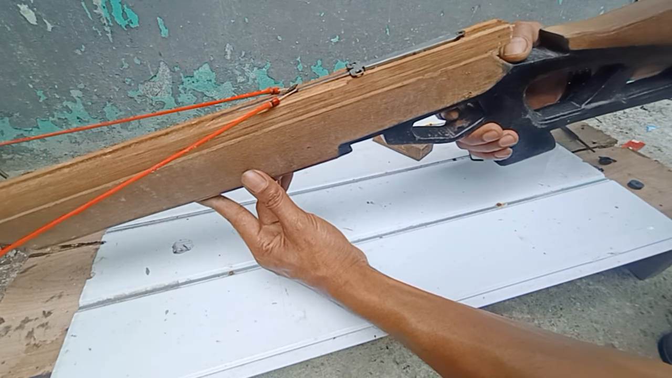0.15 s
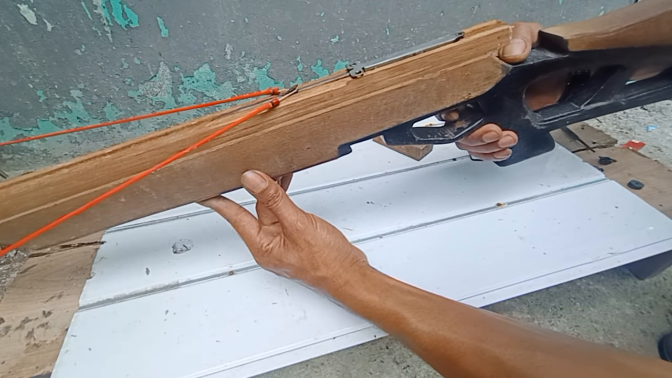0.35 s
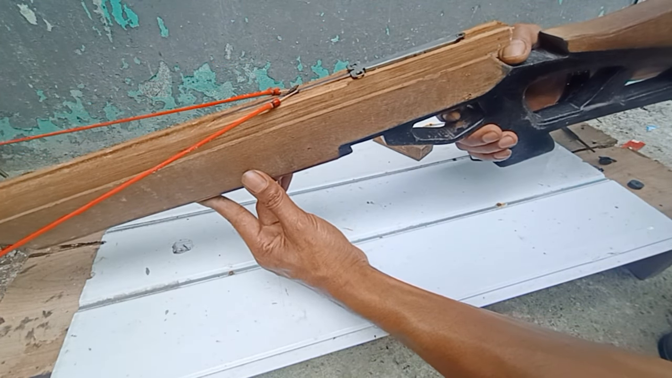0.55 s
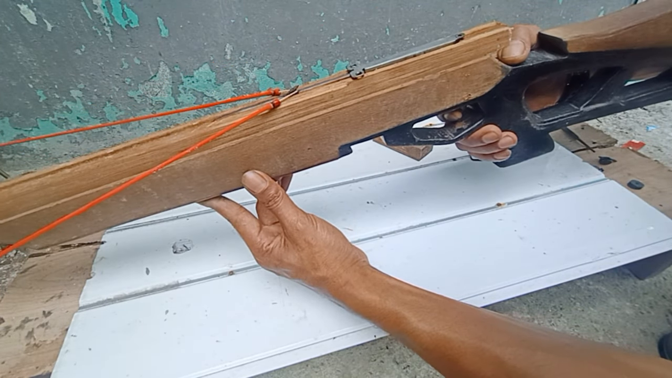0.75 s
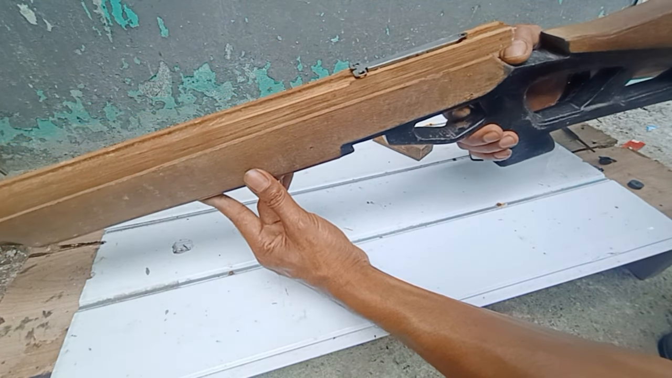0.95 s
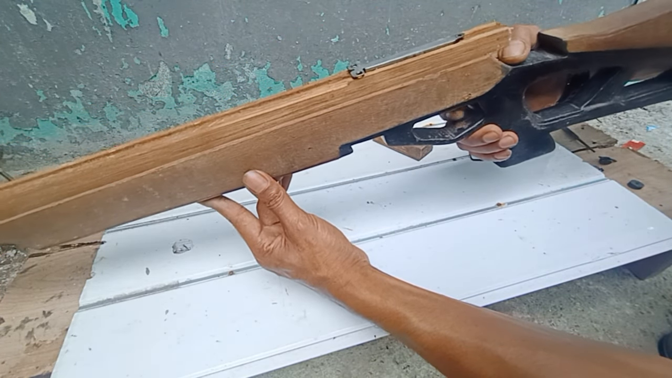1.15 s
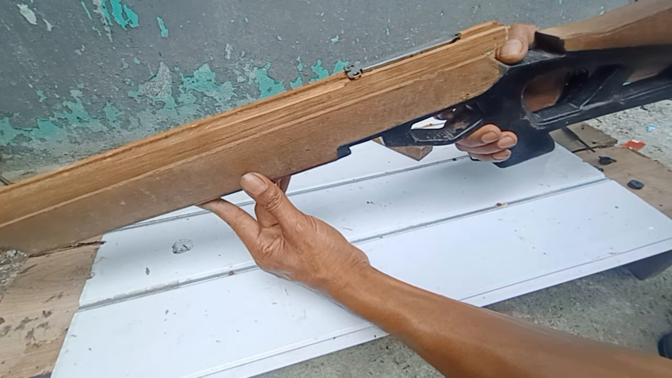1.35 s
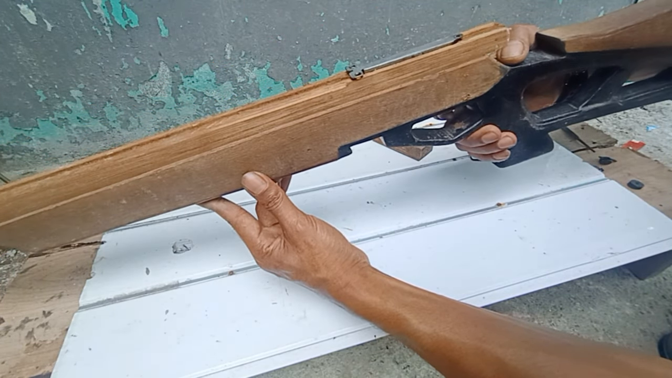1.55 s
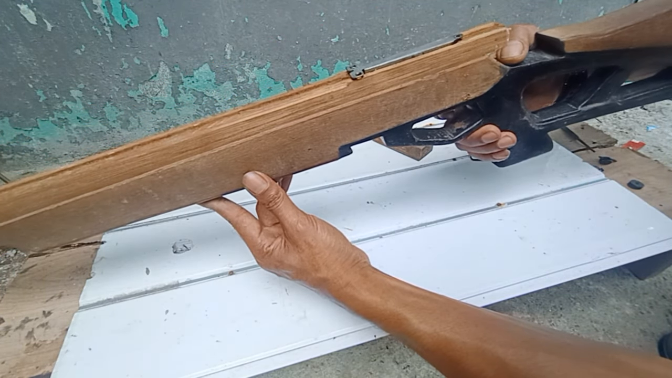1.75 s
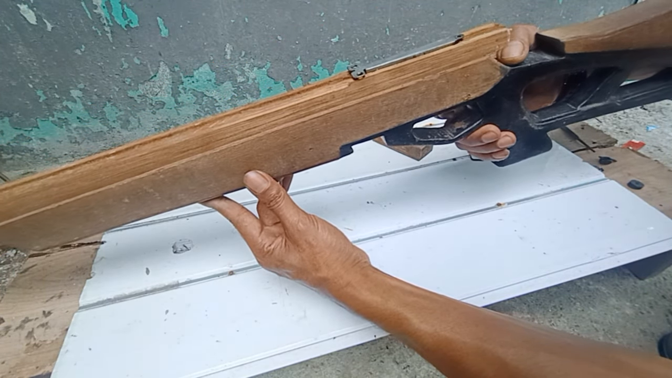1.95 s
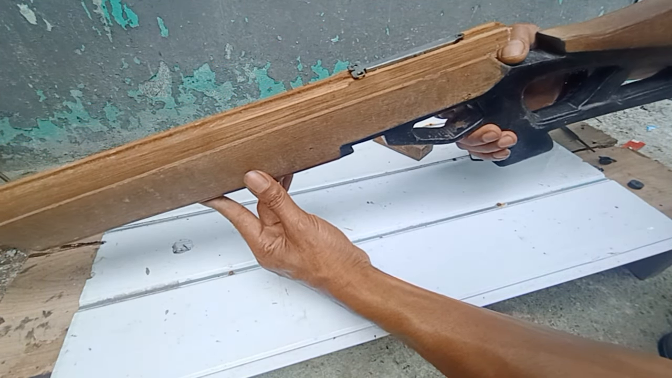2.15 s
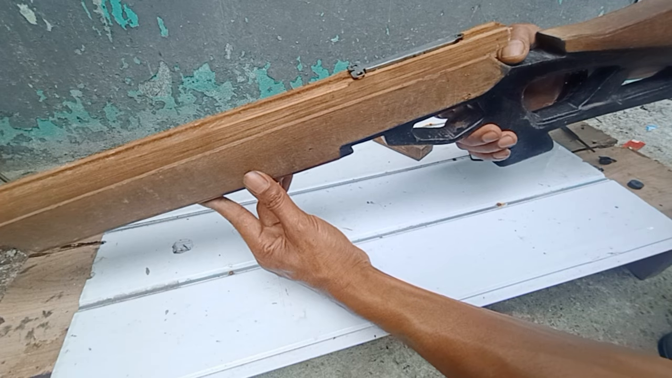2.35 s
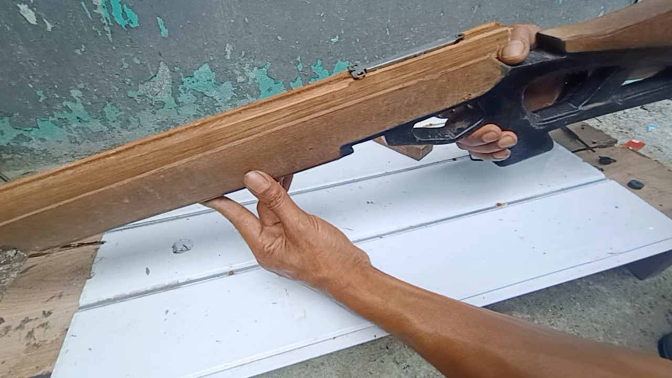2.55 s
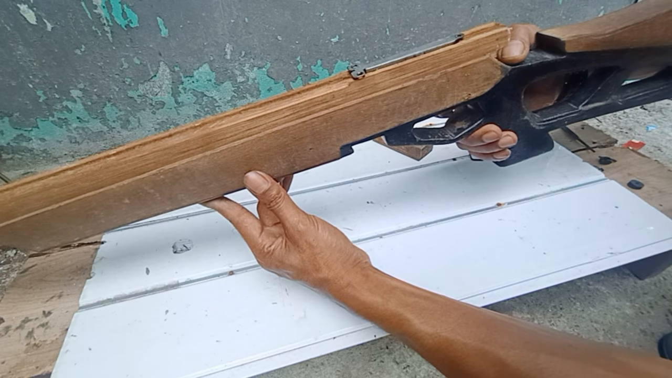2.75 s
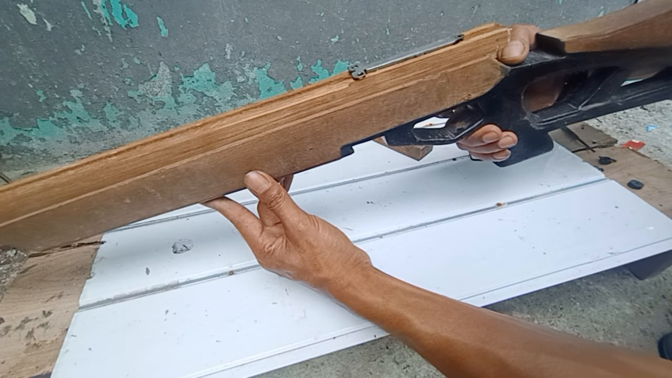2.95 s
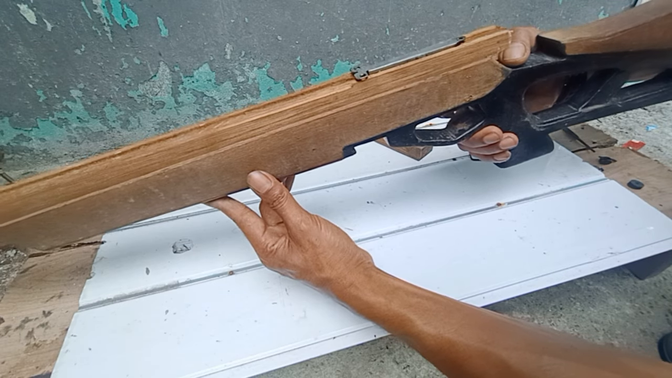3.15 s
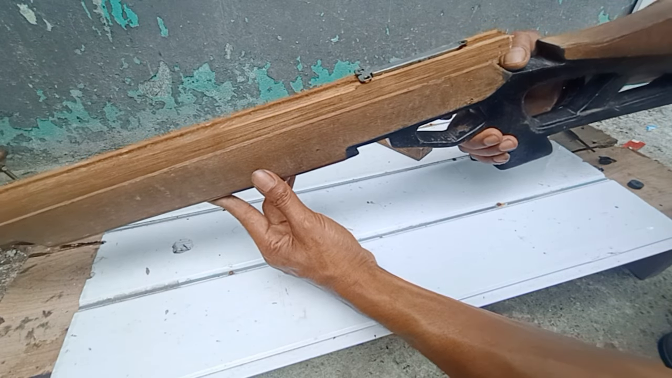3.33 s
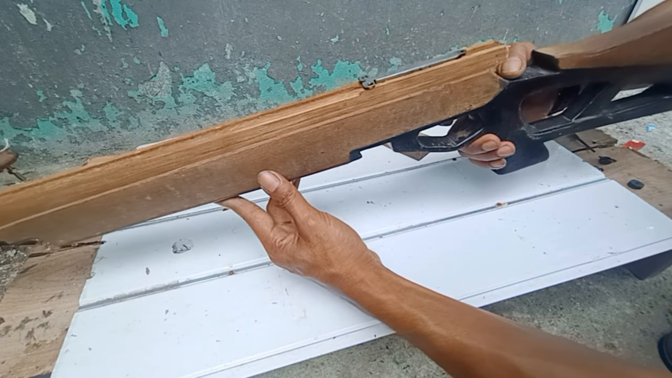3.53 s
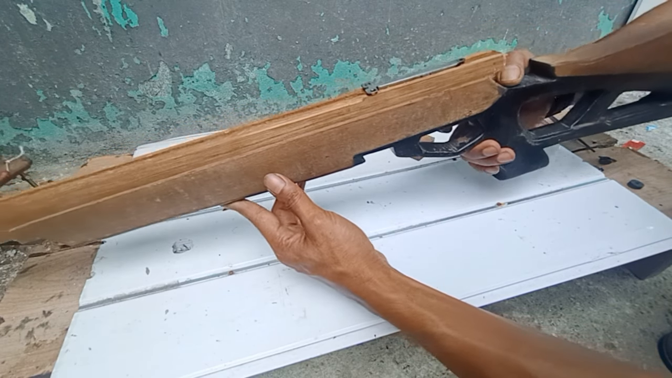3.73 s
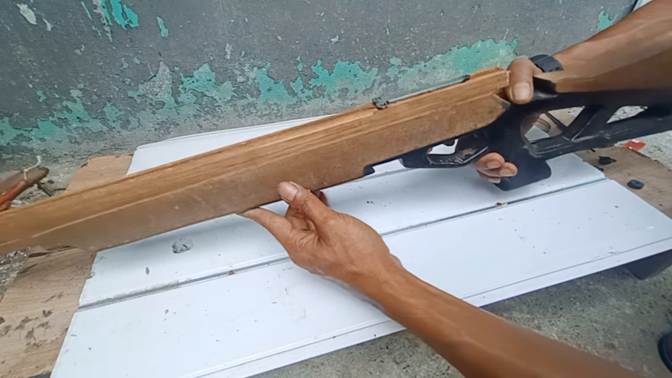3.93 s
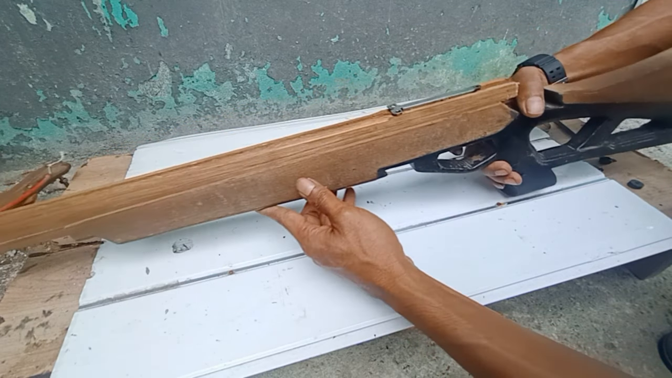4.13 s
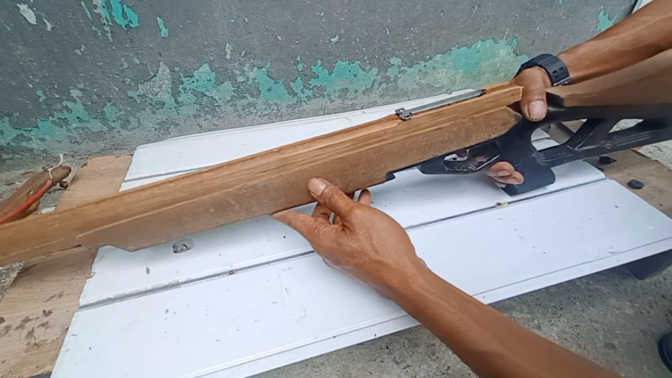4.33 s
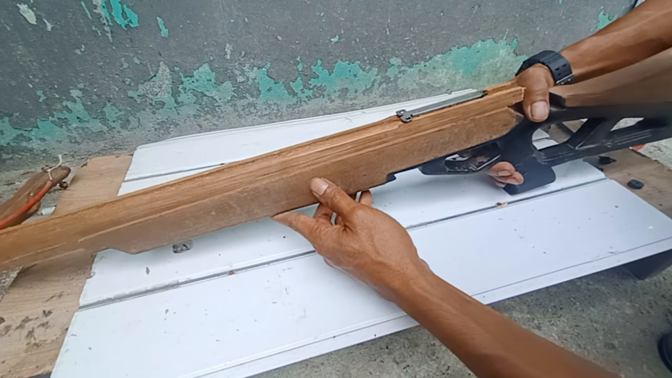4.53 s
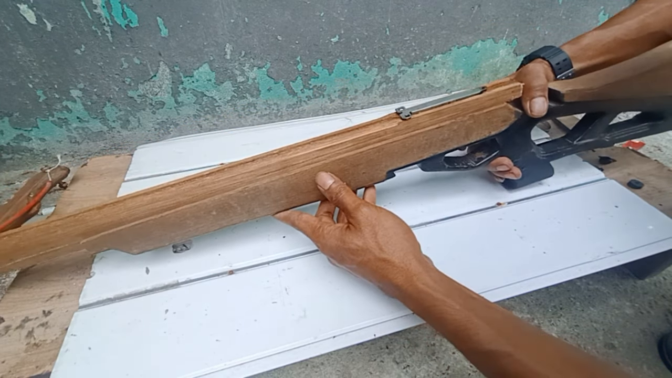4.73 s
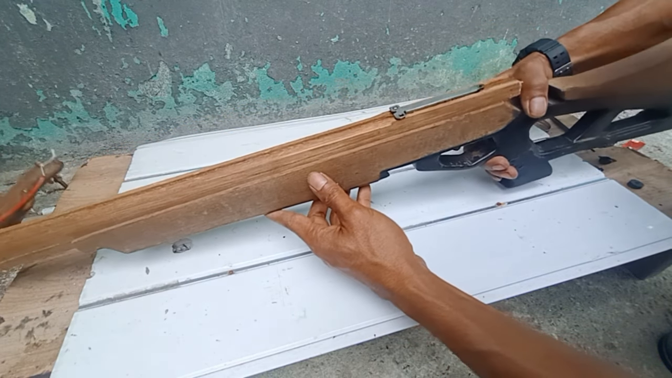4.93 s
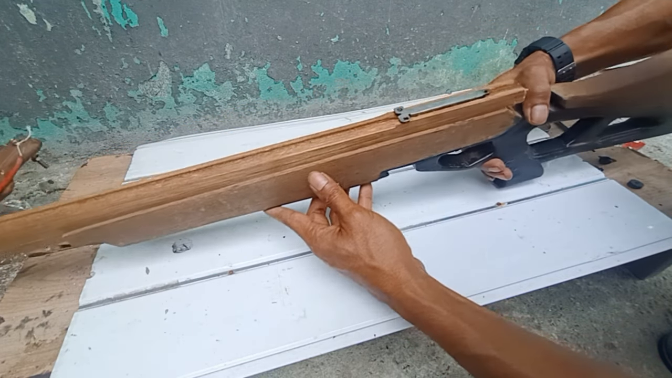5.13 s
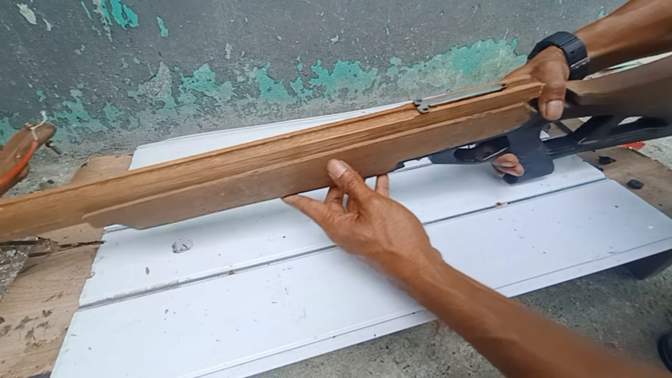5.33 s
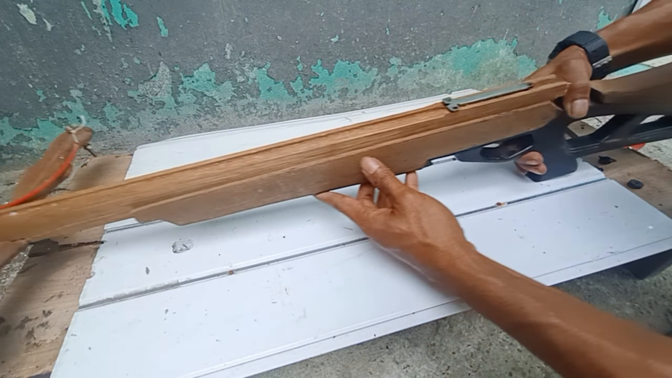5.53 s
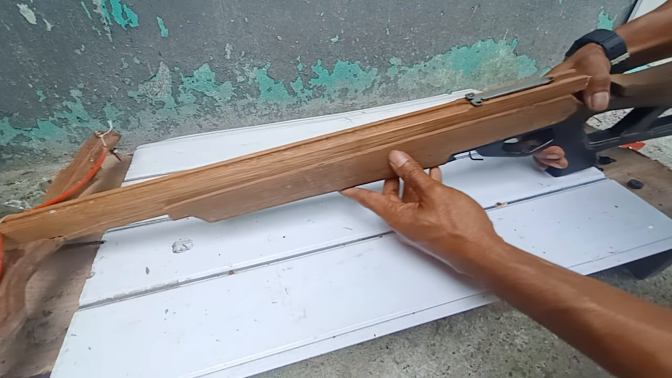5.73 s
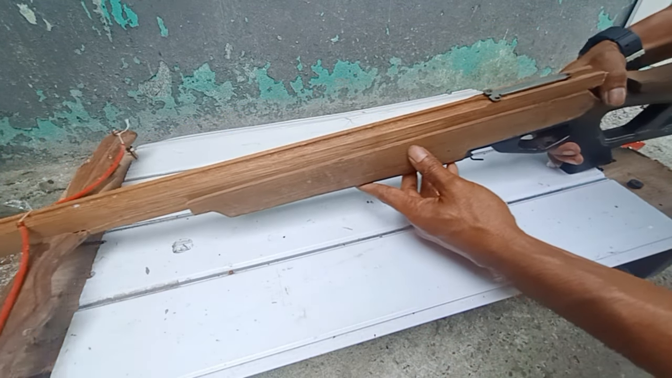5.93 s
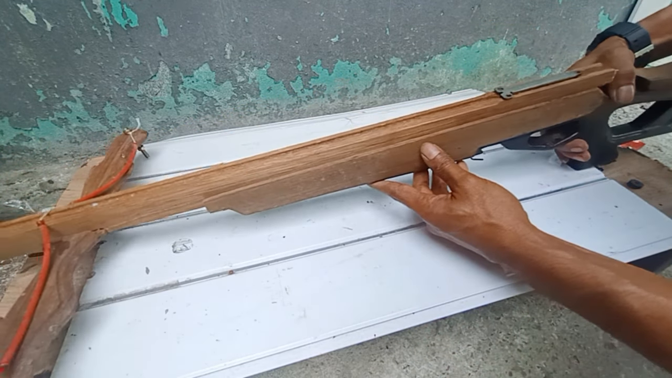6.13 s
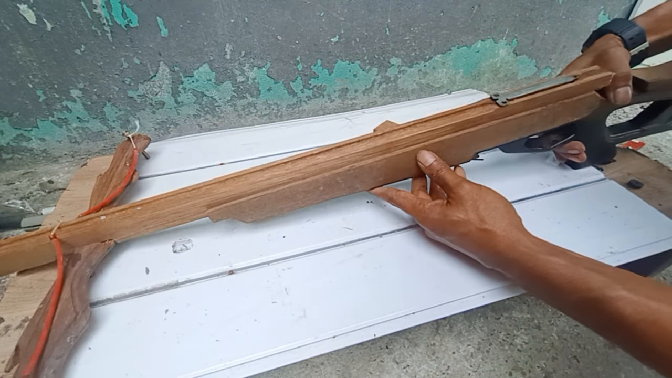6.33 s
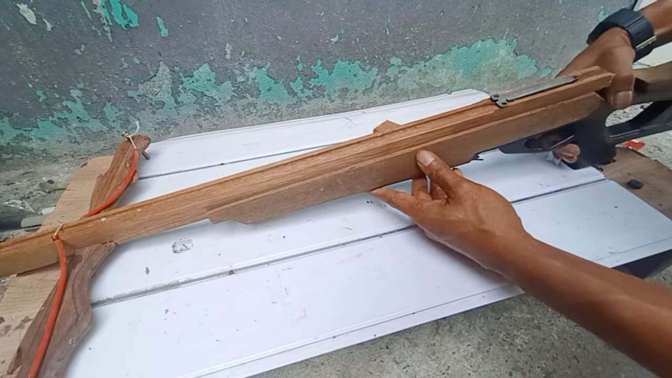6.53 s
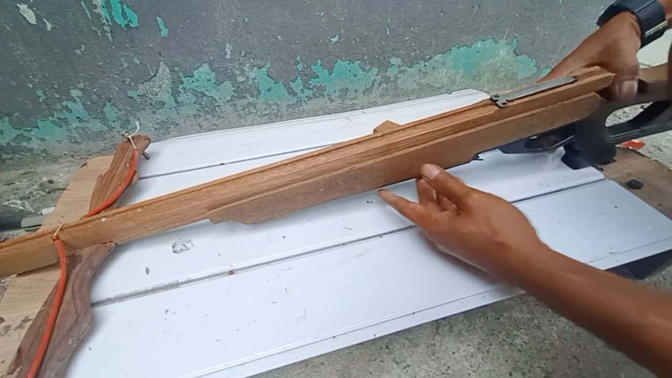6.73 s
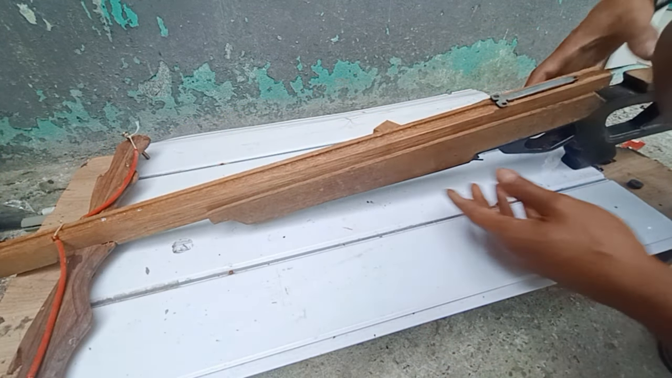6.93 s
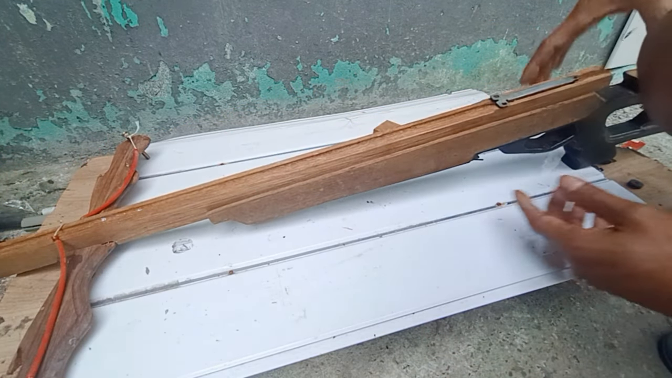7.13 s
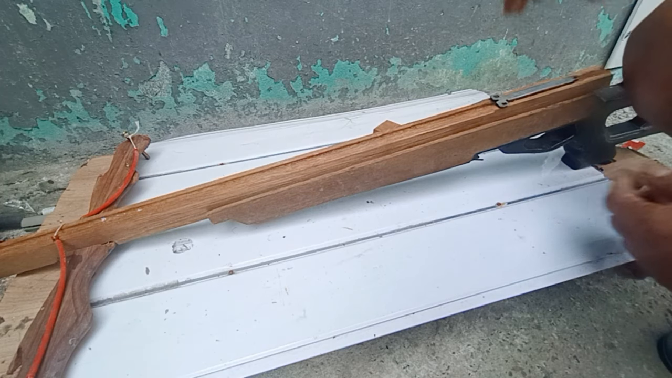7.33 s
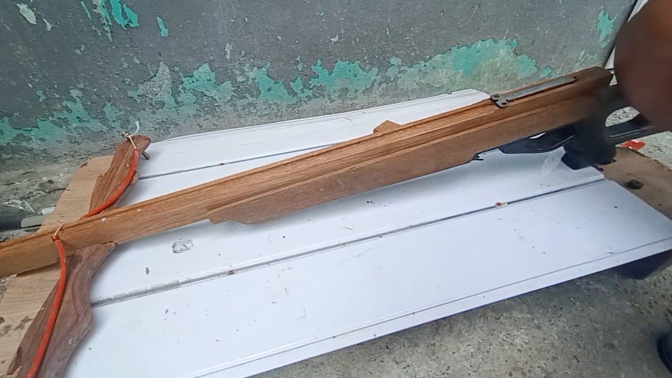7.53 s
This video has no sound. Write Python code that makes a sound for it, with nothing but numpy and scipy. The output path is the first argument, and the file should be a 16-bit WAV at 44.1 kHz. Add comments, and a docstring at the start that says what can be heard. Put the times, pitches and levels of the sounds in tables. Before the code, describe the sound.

Loud snap of stretched rubber whipping along a wooden gun and slamming its muzzle, then quiet yard, soft rubbing and clacks onto a table.

```python
"""A small yard: a home-made wooden speargun is fired over a table.
The catch lets go, rubber scours the stock, slams into the muzzle, flails and thuds; then the grip creaks, palms rub
and the gun is shifted and set down with knocks. Blows are noise bursts that ring wood modes; the rubber's thuds are
sinking tones. Insects are narrow noise bands, birds arched whistles and hoarse noise, the far rumble coloured noise."""
import sys
import numpy as np
from scipy import signal
from scipy.fft import rfft, irfft
from scipy.io import wavfile
from scipy.ndimage import uniform_filter1d

SR = 44100
rng = np.random.default_rng(int(sys.argv[2]) if len(sys.argv) > 2 else 0)


def generate_wav(sig):
    """Save sig (samples, or channels by samples) to the path in sys.argv[1] as 16-bit PCM at SR."""
    pcm = np.round(np.clip(np.atleast_2d(sig).T, -1, 1) * 32767).astype(np.int16)
    wavfile.write(sys.argv[1], SR, pcm)


N = 333837
TIME = np.arange(N) / SR
BINS_HZ = np.fft.rfftfreq(8192, 1 / SR)

# colour of a contact on the gun: [f/Hz, density/dB per Hz]
CONTACT_COLOUR = [(80, -24.5), (170, -6.5), (320, -1), (480, -5.5), (700, -4), (1250, -2.5), (1750, 3),
                  (2100, 2), (2550, 3.5), (3600, -7.5), (4700, -6.5), (5450, 3), (6500, -9.5),
                  (9800, -22.5), (11500, -19), (16000, -26.5)]
# colour of the rubber's slaps: [f/Hz, density/dB per Hz]
SLAP_COLOUR = [(70, -31.5), (160, -4), (235, 0.5), (305, -6), (380, -3), (460, -1.5), (570, 1.5), (780, -2),
               (1000, -3.5), (1400, -5), (2400, 3), (3300, -3), (4400, -2.5), (5600, 4), (7600, -14),
               (13500, -16.5), (16000, -26)]
# left-right correlation of sound in the yard: [f/Hz, correlation]
YARD_LIKENESS = [(60, 1), (290, .85), (640, 0.74), (1400, 0), (16000, 0.18)]

RELEASE_S, SLAM_S, REST_S = 0.6767, 0.73, 1.06   # catch lets go, rubber reaches muzzle, rubber hangs still
MUZZLE_LAG_S = .00045   # delay of the right ear


def from_db(db):
    """Decibels to gain."""
    return 10 ** (np.asarray(db) / 20)


def rms_one(x):
    """Scale to rms 1."""
    return x / np.sqrt(np.mean(x ** 2) + 1e-20)


def at_hz(points, hz):
    """Read a spectrum on a log-frequency axis."""
    f, value = np.transpose(points)
    return np.interp(np.log(hz + 1), np.log(f), value)


def dying(t, t60):
    """Exponential decay, 60 dB in t60."""
    return np.exp(-np.log(1000) * t / t60)


def swell(start_s, end_s, fade_s):
    """Fade in, hold, fade out."""
    return np.clip(np.minimum(TIME - start_s, end_s - TIME) / fade_s, 0, 1)


def band(x, low_hz, high_hz, order=3):
    """Causal band-pass."""
    sos = signal.butter(order, [low_hz, high_hz], "band", fs=SR, output="sos")
    return signal.sosfilt(sos, x)


def low_pass(x, cutoff_hz):
    """First-order loss of treble."""
    return signal.lfilter(*signal.butter(1, cutoff_hz, fs=SR), x)


def add(out, s, sound):
    """Mix a sound in at time s."""
    i = max(round(s * SR), 0)
    out[..., i:i + sound.shape[-1]] += sound[..., :N - i]


def diffuse(spectrum, likeness, envelope):
    """Coloured stereo noise under an envelope; likeness sets the left-right correlation over frequency."""
    size = len(envelope)
    hz = np.fft.rfftfreq(size, 1 / SR)
    alike = np.clip(at_hz(likeness, hz), -1, 1)
    mid, side = rfft(rng.standard_normal((2, size)))
    both = np.sqrt(1 + alike) * mid + np.sqrt(1 - alike) * side * [[1], [-1]]
    return envelope * rms_one(irfft(both * from_db(at_hz(spectrum, hz)), size))


def placed(x, lag_s, ring_pan_db):
    """The right ear lags by lag_s (the left if negative); the ring around 3-10 kHz leans left."""
    ring_gain = from_db(ring_pan_db * np.array([[.5], [-.5]]))
    x = x + (ring_gain - 1) * band(x, 3000, 10000, order=1)
    return np.stack([np.roll(side, round(max(lag, 0) * SR)) for side, lag in zip(x, (-lag_s, lag_s))])


def yard_air():
    """Far rumble and hiss: steady coloured noise, 1 dB stronger on the right."""
    # background colour: [f/Hz, density/dB per Hz]
    air_colour = [(25, -19.5), (50, -8.5), (90, 2.5), (220, -2), (320, -2), (450, -9), (1000, -17),
                  (1600, -20), (2500, -16.5), (3500, -27), (4700, -19.5), (6500, -33), (8600, -41),
                  (10100, -33), (11500, -39), (15500, -42)]
    level_db = -63
    return diffuse(air_colour, YARD_LIKENESS, np.full(N, from_db(level_db))) * from_db([[-.5], [.5]])


def insects(width_hz, fade_s):
    """Insect song: narrow noise bands that swell and fade."""
    # stretches of song: [start/s, end/s, centre f/Hz]
    stretches = [(-.1, 0.34, 4830), (1.12, 2.75, 4660), (1.85, 2.399, 4850), (2.95, 3.548, 4820),
                 (2.95, 4.485, 4540), (4.58, 5.052, 4855), (5.146, 5.855, 4550), (5.95, 6.453, 4820),
                 (6.5, 7.497, 4576)]
    song_db = -75
    out = np.zeros((2, N))
    for start_s, end_s, hz in stretches:
        level = swell(start_s, end_s, fade_s)
        level = level[level > 0]
        noise = rng.standard_normal((2, 2 * SR))
        song = rms_one(band(noise, hz - width_hz / 2, hz + width_hz / 2, order=2))
        add(out, start_s, level * song[:, :len(level)])
    return from_db(song_db) * out


def birds(waver):
    """Far birds: arched, wavering sine whistles and hoarse chirps of 5-5.9 kHz noise."""
    # whistles: [t/s, length/s, middle f/Hz, rise/Hz, rms level/dB]
    whistles = [(1.188, .09, 2790, 0, -73), (2.678, 0.12, 4130, -150, -71),
                (2.781, 0.26, 3200, -320, -79.5), (3.17, 0.27, 3720, 260, -77), (3.55, 0.12, 4230, 57, -68),
                (4.615, .17, 4180, -240, -75), (5.217, 0.123, 2636, 114, -65), (5.723, 0.24, 3950, 24, -73),
                (6.568, 0.11, 2930, 41, -77)]
    # hoarse chirps: [centre t/s, Gaussian 1/e half-width/s, level/dB]
    rasps = [(.12, 0.2, -83), (0.62, 0.019, -71.5), (2.609, 0.044, -63)]
    arch_hz = 96.5   # droop at both ends of a whistle
    out = np.zeros((2, N))
    for s, length_s, middle_hz, rise_hz, db in whistles:
        u = np.linspace(-1, 1, int(length_s * SR))
        hz = middle_hz + rise_hz * u / 2 - arch_hz * u ** 2
        wobble = rms_one(uniform_filter1d(rng.standard_normal((2, SR)), SR // 200))[:, :len(u)]
        phase = 2 * np.pi * np.cumsum(hz * (1 + waver * wobble), axis=1) / SR
        add(out, s, from_db(db) * 2 * np.cos(np.pi * u / 2) * np.sin(phase))
    hoarse = sum(from_db(db) * np.exp(-((TIME - s) / half_s) ** 2) for s, half_s, db in rasps)
    return out + hoarse * rms_one(band(rng.standard_normal((2, N)), 5000, 5900, order=2))


def gun_response(crack_t60, modes_db, yard_db, yard_t60, wall_hz):
    """One touch on the gun: a short crack, ringing modes, duller wash from table and walls."""
    # modes of the gun: [f/Hz, relative level/dB, t60/s]
    gun_modes = [(240, -3, .07), (322.4, 1.5, 0.058), (382, -6.5, .11), (518, -1, 0.034), (643, -3.5, .08),
                 (780, -6.5, .08), (837.8, -3.5, .09), (1255, -6.5, 0.17), (1625, -7, 0.14),
                 (1733, -8.5, .06), (1918, -11, .07), (2166, -4, .07), (2200, -3, .06), (2315, -6, 0.023),
                 (2570, -7, 0.037), (2650, -7.5, .05), (2850, -4, .06), (3410, -13.5, .06),
                 (4587, -11, .05), (4886, -10, 0.078), (5758, -3, 0.014), (5532, -8, 0.042)]
    # left-right correlation close to the gun: [f/Hz, correlation]
    near_likeness = [(60, 1), (290, 0.54), (600, 0.54), (1400, .4), (3000, 0.083), (16000, 0.207)]
    t = TIME[:SR // 6]
    ringing = 0
    for hz, db, t60 in gun_modes:
        sign = rng.choice([-1, 1])
        ringing = ringing + from_db(db) * sign * np.sin(2 * np.pi * hz * t) * dying(t, t60)
    crack = diffuse(CONTACT_COLOUR, near_likeness, dying(t, crack_t60))
    wash_level = dying(t, yard_t60) * (1 - np.exp(-t / .004))
    wash = low_pass(diffuse(CONTACT_COLOUR, YARD_LIKENESS, wash_level), wall_hz)
    return crack + from_db(modes_db) * ringing + from_db(yard_db) * wash


def tapped():
    """The gun's answer to a hand or the table."""
    return gun_response(crack_t60=0.031, modes_db=-18.5, yard_db=-13.5, yard_t60=.12, wall_hz=4970)


def whipped():
    """The gun's answer to the rubber; noise and mode signs are drawn anew each time."""
    return gun_response(crack_t60=0.028, modes_db=-16.5, yard_db=-15.5, yard_t60=.18, wall_hz=10000)


def recolour(x, gain, order=45):
    """Give a short sound a broad colour, keeping its fine ripple and its attack (minimum phase)."""
    half = len(gain) - 1
    bins = rfft(x, 2 * half)
    power = uniform_filter1d(np.mean(np.abs(bins) ** 2, axis=0), order) + 1e-12
    cepstrum = irfft(np.log(gain / np.sqrt(power)))
    # fold onto positive time: minimum phase
    cepstrum[1:half] *= 2
    cepstrum[half + 1:] = 0
    return irfft(bins * np.exp(rfft(cepstrum)))


def registers(db, weight_db, hardness_db, edge_db, edge_follow=1):
    """Levels of knock, clack, ring and edge: a heavy blow moves the wood, a hard one brings out the top."""
    return db + np.array([weight_db, 0, hardness_db, edge_follow * hardness_db + edge_db])


def blow_colour(colour, levels_db, spot_hz, spot_db, count=3):
    """Where and how hard a blow lands bends the colour smoothly through knock, clack, ring and edge."""
    # bounds of the four registers: [f/Hz]
    register_edges = [200, 900, 3500, 7200, 15500]
    edges = np.array(register_edges)
    centres = np.sqrt(edges[1:] * edges[:-1])
    spot = spot_db / (1 + (10 * (BINS_HZ / spot_hz - 1)) ** 2)
    gain = from_db(at_hz(colour, BINS_HZ) + spot)
    for _ in range(count):
        # register power, as a mean over 15 ms
        power = np.histogram(BINS_HZ, edges, weights=gain ** 2)[0] / (len(gain) * SR * .015)
        error_db = levels_db - 10 * np.log10(power)
        gain = gain * from_db(at_hz(np.c_[centres, error_db], BINS_HZ))
    return gain


def blow(response, gain, contact_s, grain_db, chatter_db, chatter_t60, chatter_hz):
    """A burst of tiny contacts, then a softer dying chatter, sets the gun ringing."""
    t = TIME[:SR // 10]
    grain = from_db(grain_db * rng.standard_normal((2, len(t))))
    strike, chatter = rng.standard_normal((2, len(t))) * grain
    strike = strike * rms_one(np.exp(-(t / contact_s) ** 4))
    chatter = low_pass(chatter, chatter_hz) * from_db(chatter_db) * rms_one(dying(t, chatter_t60))
    force = strike + chatter
    return recolour(signal.fftconvolve(force[None], response, axes=1), gain)


def knocks():
    """The gun knocks in the hands and on the table: short blows ring the wood."""
    # knocks; weight lifts the low wood, hardness the top:
    # [t/s, contact/s, level/dB, weight/dB, hardness/dB]
    knock_rows = [(0.5375, 0.0066, -53, -21, -19), (1.3948, 0.01, -67.5, -17, -2),
                  (3.9051, 0.004, -53.5, -5.5, -14), (3.969, 0.00074, -48, -11, -2.5),
                  (4.0045, 0.0026, -57, 6, -23), (4.1154, 0.0025, -61, 4.5, -15),
                  (4.25, 0.0016, -58.5, -6, -12), (4.2584, .002, -59.5, 1, -11.5),
                  (4.76, .002, -62, -5, -8.5), (5.2799, .028, -53, 5, -10), (5.3236, 0.017, -57, 7.5, -15),
                  (5.4134, .0022, -55.5, 12, -10.5), (5.4328, 0.0016, -28, -9.5, -3.5),
                  (5.504, .004, -56, -11, -3), (5.5883, 0.0034, -63, 0.5, -16.5),
                  (5.8125, 0.005, -60.5, 9, -6), (5.8258, 0.022, -53, -1.5, -5),
                  (5.9373, 0.0029, -39.5, -2.5, -9.5), (5.9565, 0.025, -49, 2, -8),
                  (6.0602, 0.004, -49, -2, -7), (6.065, 0.0016, -31, -5, -6), (6.1087, 0.023, -51, 1, -7.5),
                  (6.144, 0.0095, -41, -3, -10), (6.1625, 0.011, -42.5, -5, -4),
                  (6.2098, 0.0015, -56, -1.5, -10), (6.238, 0.0026, -60.5, -14, -6.5)]
    wood_hz = 312   # pitch favoured
    out = np.zeros((2, N))
    for s, contact_s, db, weight_db, hardness_db in knock_rows:
        levels_db = registers(db, weight_db, hardness_db, edge_db=-9.0, edge_follow=2)
        gain = blow_colour(CONTACT_COLOUR, levels_db, wood_hz, spot_db=4)
        knock = blow(tapped(), gain, contact_s, grain_db=0.46,
                     chatter_db=-11, chatter_t60=0.12, chatter_hz=400)
        add(out, s, knock)
    return out


def slaps():
    """Loud single blows of the shot: first the catch on the right, then the muzzle on the left."""
    # catch, slam and main rebounds of the rubber:
    # [t/s, contact/s, favoured wood f/Hz, level/dB, weight/dB, hardness/dB]
    slap_rows = [(0.6761, 0.0051, 800, -22, -21, -1), (0.73, 0.008, 554, -18, 4, -2.5),
                 (0.7955, .008, 380, -28.5, -11, -10), (0.8139, 0.0086, 380, -33.5, 2, 1.5),
                 (0.8721, 0.0068, 1600, -26, 7, -13.5), (0.964, .0058, 560, -39.5, 4, -2.5),
                 (1.0203, 0.0072, 654, -36.5, -18, 0.5)]
    catch_lag_s = -.00043
    out = np.zeros((2, N))
    for s, contact_s, spot_hz, db, weight_db, hardness_db in slap_rows:
        levels_db = registers(db, weight_db, hardness_db, edge_db=-15.5)
        gain = blow_colour(SLAP_COLOUR, levels_db, spot_hz, spot_db=6.5)
        slap = blow(whipped(), gain, contact_s, grain_db=6.0,
                    chatter_db=-20, chatter_t60=.15, chatter_hz=3000)
        lag_s = catch_lag_s if s < (RELEASE_S + SLAM_S) / 2 else MUZZLE_LAG_S
        add(out, s, placed(slap, lag_s, ring_pan_db=3))
    return out


def rattle(level_db, weight_db, hardness_db, grain_db, count=3):
    """Dense tiny contacts of rubber on several spots of the stock, following a level."""
    size = len(level_db)
    levels_db = registers(0, weight_db, hardness_db, edge_db=-17)
    gain = blow_colour(SLAP_COLOUR, levels_db, spot_hz=374, spot_db=0)
    out = 0
    for _ in range(count):
        grain = from_db(grain_db * rng.standard_normal(size))
        force = rms_one(rng.standard_normal(size) * grain) * from_db(level_db)
        out = out + signal.fftconvolve(force[None], recolour(whipped(), gain), axes=1)
    return out / np.sqrt(count * SR * .015)   # 15 ms reference of blow_colour


def flaps(t, uneven, spread_db):
    """Level of a run of flaps, each with a sharp start and a strength of its own."""
    flaps_per_s, depth_db = 41, 17.5   # each flap falls away by depth_db
    pace, strength = rng.standard_normal((2, 40))
    starts_s = (np.arange(40) + np.clip(uneven * pace, -.45, .45)) / flaps_per_s
    turn = np.interp(t, starts_s, np.arange(40))
    return depth_db * (.5 - turn % 1) + spread_db * strength[turn.astype(int)]


def rubber():
    """The band scours the stock ever louder, then flails about the muzzle, losing energy steadily."""
    whip_db, whip_swell_db = -33.5, 7.5
    flail_db, loss_db_per_s = -31, 87
    out = np.zeros((2, N))
    travel = np.linspace(0, 1, int((SLAM_S - RELEASE_S) * SR))
    whip_level_db = whip_db + whip_swell_db * travel
    add(out, RELEASE_S, rattle(whip_level_db, weight_db=-14.5, hardness_db=-2.5, grain_db=7))
    t = TIME[:int((REST_S - SLAM_S) * SR)]
    flail_level_db = flail_db - loss_db_per_s * t + flaps(t, uneven=.12, spread_db=1.85)
    add(out, SLAM_S, rattle(flail_level_db, weight_db=0, hardness_db=-4.5, grain_db=6))
    return out


def thuds():
    """Slack rubber thuds on the stock: its pitch sinks as it loses its tension."""
    # thuds: [t/s, nominal peak/dB, final f/Hz, t60/s]
    thud_rows = [(0.7287, -16.5, 205, .05), (0.7435, -15, 141.4, 0.13), (0.755, -21, 66, .11),
                 (0.799, -28, 142, 0.17), (.818, -13.5, 97, 0.05), (0.87, -27, 191, 0.05),
                 (0.968, -24.5, 96, 0.1), (1.067, -44, 105, 0.097)]
    sharp, glide_s = .3, .02   # initial pitch excess (share), its time constant
    out, t = np.zeros(N), TIME[:SR // 4]
    for s, db, final_hz, t60 in thud_rows:
        hz = final_hz * (1 + sharp * np.exp(-t / glide_s))
        tone = np.sin(2 * np.pi * np.cumsum(hz) / SR)
        add(out, s, -from_db(db) * tone * dying(t, t60) * (1 - np.exp(-t / .002)))
    return out


def creak(level_db, jitter_s, fade_db):
    """Skin sticks and slips unevenly on the grip; each slip rings it briefly."""
    # creaks: [start/s, length/s, slip rate/Hz, relative level/dB]
    creak_rows = [(2.851, .065, 62, -53.5), (2.973, .05, 64, -52.5), (3.082, 0.067, 125, -58)]
    # modes of the grip: [f/Hz, mean relative level/dB, t60/s]
    grip_modes = [(1050, -4, 0.034), (1489, -3.5, 0.052), (1790, 6.5, 0.0061), (2320, -4.5, 0.022),
                  (2660, -5, 0.02)]
    out, t = np.zeros((2, N)), TIME[:SR // 20]
    for start_s, length_s, slips_per_s, db in creak_rows:
        for s in np.arange(0, length_s, 1 / slips_per_s):
            slip = 0
            for hz, mode_db, t60 in grip_modes:
                gain = from_db(mode_db + rng.normal(0, 2.9, (2, 1))) * rng.choice([-1, 1])
                slip = slip + gain * np.sin(2 * np.pi * hz * t) * dying(t, t60)
            slip_s = start_s + s + jitter_s * rng.standard_normal()
            add(out, slip_s, from_db(db + level_db - fade_db * s / length_s) * slip)
    return out


def rubbing(grain_db):
    """Palms drag over the grain of the wood: noise strokes, the early ones joined, the later ones apart."""
    # strokes, timed at half amplitude: [start/s, end/s, level/dB]
    stroke_rows = [(3.56, 3.862, -65), (3.86, 4.254, -69.5), (4.25, 5.2, -75), (5.25, 5.753, -68.5),
                   (5.95, 6.28, -65.5), (6.57, 6.67, -68), (7.12, 7.45, -72.5)]
    # colour of the rubbing: [f/Hz, density/dB per Hz]
    rub_colour = [(60, -26), (200, -14), (500, 10.5), (1100, -4.5), (2200, 2.5), (3500, -3.5), (5500, 0),
                  (7500, -18), (13500, -17), (16000, -31)]
    fade_s = 0.064
    grain = rms_one(uniform_filter1d(rng.standard_normal(N), SR // 200))
    strokes = sum(from_db(db) * swell(start_s - fade_s / 2, end_s + fade_s / 2, fade_s)
                  for start_s, end_s, db in stroke_rows)
    return diffuse(rub_colour, YARD_LIKENESS, strokes * from_db(grain_db * grain))


def taps(spread_db):
    """Soft fingers tap the stock at uneven moments as the hand changes its hold."""
    from_s, to_s, taps_per_s, mean_db = 3.94, 4.16, 30, -65.5
    out = np.zeros((2, N))
    for s in np.arange(from_s, to_s, 1 / taps_per_s):
        tap_db = mean_db + rng.normal(0, spread_db)
        levels_db = registers(tap_db, weight_db=0.0, hardness_db=-14, edge_db=-22)
        gain = blow_colour(CONTACT_COLOUR, levels_db, spot_hz=430, spot_db=-2)
        add(out, s + rng.random() / taps_per_s, recolour(tapped(), gain))
    return out


def scene():
    """The shot and the handling, close by, over the quiet yard."""
    wildlife = insects(width_hz=130, fade_s=0.064) + birds(waver=0.0132)
    band_sound = rubber() + thuds() * from_db([[-.8], [.5]])
    shot = slaps() + placed(band_sound, MUZZLE_LAG_S, ring_pan_db=3)
    handling = placed(knocks() + taps(spread_db=1.5), lag_s=.00025, ring_pan_db=0.22)
    hands = rubbing(grain_db=2.5) + creak(level_db=-5.0, jitter_s=0.0026, fade_db=1.5)
    return shot + handling + hands + yard_air() + wildlife


def record(dry):
    """The microphone loses the deep bass; the top is cut steeply at 15.8 kHz."""
    thin = signal.sosfilt(signal.butter(2, 35, "high", fs=SR, output="sos"), dry)
    return signal.sosfilt(signal.ellip(10, .1, 80, 15800, fs=SR, output="sos"), thin)


dry = scene()
out = record(dry)
generate_wav(out)
```